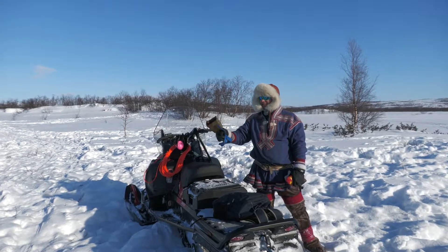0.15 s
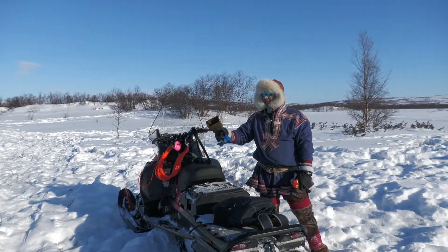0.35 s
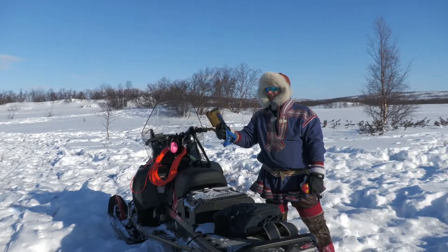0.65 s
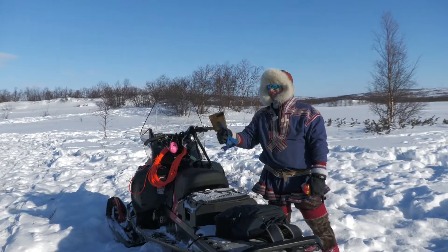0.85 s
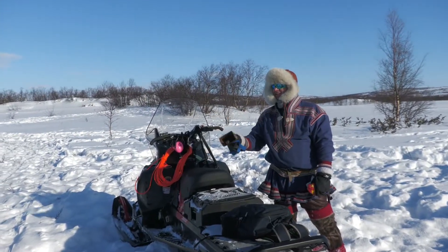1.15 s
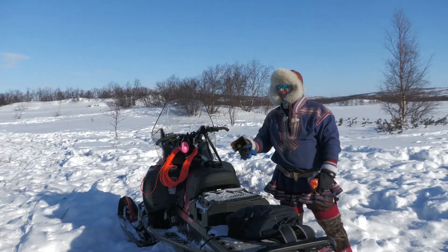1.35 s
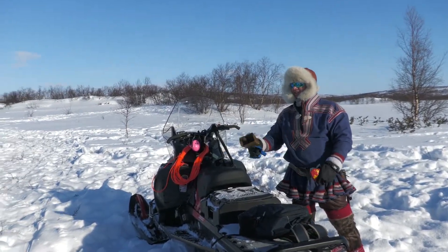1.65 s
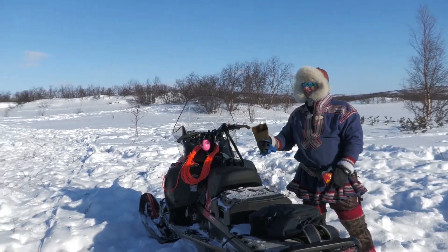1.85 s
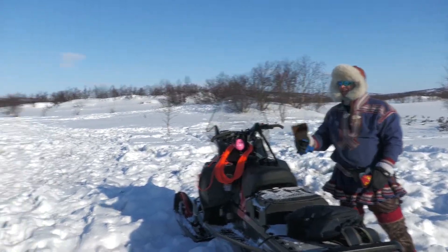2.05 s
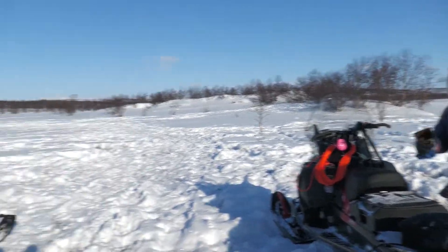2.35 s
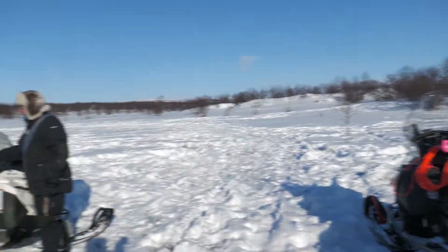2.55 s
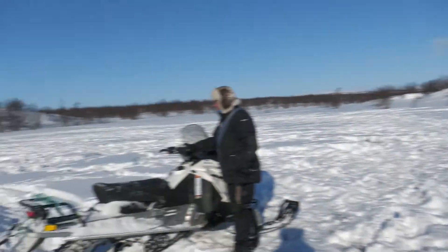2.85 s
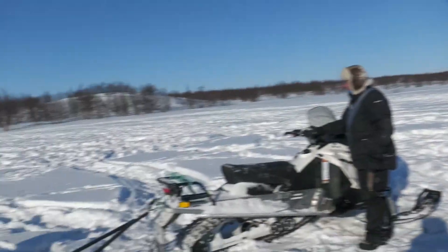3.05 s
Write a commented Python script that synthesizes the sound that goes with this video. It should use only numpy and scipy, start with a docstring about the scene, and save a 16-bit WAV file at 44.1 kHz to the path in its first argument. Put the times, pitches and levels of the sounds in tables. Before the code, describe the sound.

Close to the microphone in an open snowfield, a cowbell clangs in a quick, even rhythm, loud and slightly distorted. The ringing cuts off, followed by a faint swish of clothing and two quiet footsteps in snow.

```python
"""A sheet-metal cowbell, shaken by hand over open snow, close to a single microphone, with no echo.
The clapper strikes about ten times a second, each stroke a hollow note, a crack and a clang; in between
it taps and chatters on the wall. The bell is then muffled, leaving faint air, a brush of clothing and
two soft steps in the snow. Loud strokes overload the recorder, which saturates and adds a faint thud."""
import sys
import numpy as np
from scipy import signal
from scipy.fft import rfft, irfft, next_fast_len
from scipy.io import wavfile

SR = 44100
rng = np.random.default_rng(int(sys.argv[2]) if len(sys.argv) > 2 else 0)


def wrap_up_sound(samples):
    """Save the sound to the file named by the first command line argument, as 16-bit audio."""
    columns = np.atleast_2d(samples).T
    # keep every value between -1 and 1, then stretch to whole-number steps
    tamed = np.clip(columns, -1, 1)
    steps = np.round(tamed * 32767).astype(np.int16)
    wavfile.write(sys.argv[1], SR, steps)


N = 141120
TIME_S = np.arange(N) / SR
TOP_HZ = 16400


def amp(db):
    """Decibels to gain."""
    return 10 ** (np.asarray(db) / 20)


def unit(x):
    """Scale to rms 1."""
    return x / np.sqrt(np.mean(x ** 2) + 1e-20)


def level_at(spectrum, hz):
    """Read (Hz, dB) points on a log frequency axis."""
    point_hz, db = np.transpose(spectrum)
    return np.interp(np.log(hz + 1), np.log(point_hz + 1), db)


def curve(rows, column=1):
    """Read one column of a time table at every sample."""
    rows = np.asarray(rows)
    return np.interp(TIME_S, rows[:, 0], rows[:, column])


def filtered(x, response):
    """Apply a gain that depends on frequency."""
    size = next_fast_len(N + SR // 2)
    return irfft(rfft(x, size) * response(np.fft.rfftfreq(size, 1 / SR)), size)[:N]


def noise(spectrum):
    """Coloured noise of rms 1."""
    return unit(filtered(rng.standard_normal(N), lambda hz: amp(level_at(spectrum, hz))))


def impulses(starts, sizes):
    """One impulse at each start, given in seconds."""
    return np.bincount(np.clip(np.round(starts * SR).astype(int), 0, N - 1), sizes, N)


def fade(x, t60):
    """Give every impulse a decay of 60 dB in t60 seconds."""
    return signal.lfilter([1], [1, -amp(-60 / (t60 * SR))], x)


def ring(x, hz, t60):
    """One mode: a unit impulse starts a decaying sine of height 1."""
    radius, angle = amp(-60 / (t60 * SR)), 2 * np.pi * hz / SR
    return signal.lfilter([0, radius * np.sin(angle)], [1, -2 * radius * np.cos(angle), radius ** 2], x)


# Air over the snowfield. Each row: frequency in Hz, relative level in dB.
AIR_SPECTRUM = [(25, -7), (60, -5), (130, 5), (300, -1.5), (500, -4), (1000, -10.5), (3000, -16.5),
                (5000, -28.5), (8000, -28), (16000, -36)]
# The air at the microphone. Each row: time in seconds, level in dB.
AIR_SWELL = [(0, -67.5), (2.4, -79), (2.6, -66.5), (3.0, -60.5), (3.2, -62.5)]
def air():
    """Faint outdoor air sinks slowly, then swells near the end."""
    return amp(curve(AIR_SWELL)) * noise(AIR_SPECTRUM)


# Clothing near the microphone. Each row: frequency in Hz, relative level in dB.
CLOTH_SPECTRUM = [(200, 21), (1500, 13), (4500, 6), (7000, -17), (15000, -7)]
def clothing(peak_s=2.857, width_s=0.032, peak_db=-57):
    """Cloth brushes once in a short, smooth swish."""
    return amp(peak_db) * np.exp(-((TIME_S - peak_s) / width_s) ** 2) * noise(CLOTH_SPECTRUM)


# Steps in the snow. Each row: start in seconds, level in dB.
FOOTFALLS = [(2.921, -47), (3.176, -43.5)]
# Snow underfoot. Each row: frequency in Hz, relative level in dB.
SNOW_SPECTRUM = [(40, -11.5), (150, -14), (300, 12), (600, -3), (1200, -12), (2500, -49), (10000, -63.5)]
def footsteps(attack_s=0.0032, t60=0.08):
    """Snow gives way softly under each foot."""
    tread = np.zeros(N)
    for start, db in FOOTFALLS:
        age = np.maximum(TIME_S - start, 0)
        tread += amp(db - 60 * age / t60) * np.minimum(age / attack_s, 1)
    return tread * noise(SNOW_SPECTRUM)


# Full clapper strokes. Each row: start in seconds, then hollow note, clang, treble and crack in dB.
FULL_STROKES = [(0.0, -17, -34, -46.5, -28), (0.1192, -12, -41, -49, -19.5),
                (0.2222, -22, -25.5, -39.5, -20.5), (0.2993, -13.5, -44, -46, -17.0),
                (0.3886, -8, -34.5, -47.5, -20.5), (0.4664, -14, -32.5, -38.5, -19.5),
                (0.5686, -12.5, -40, -48, -20.5), (0.6505, -16, -47, -50, -17.5),
                (0.7543, -10, -59.5, -52, -22), (0.8461, -12.5, -36.5, -51, -17.5),
                (0.9578, -11, -35.5, -62, -20.5), (1.0501, -14, -34.5, -44, -16),
                (1.1522, -10.0, -35, -46.5, -18.5), (1.2288, -13, -55.5, -47.5, -18.5),
                (1.3336, -9.5, -48, -48.5, -18.5), (1.4203, -11.5, -36.5, -53, -21.5),
                (1.5101, -13.5, -38.5, -41.5, -25), (1.5784, -11, -35, -43.5, -23),
                (1.7055, -11.5, -39, -50, -17.0), (1.7765, -16, -32, -38, -24.5),
                (1.8864, -9.5, -44, -55, -16.5), (1.973, -14, -30, -43.5, -23.5),
                (2.0756, -8.5, -36, -54, -21), (2.1741, -12.5, -36.5, -51, -22.5),
                (2.2805, -15.0, -28, -36.5, -23), (2.3711, -11.5, -37.5, -48, -19.5),
                (2.6298, -7, -35.0, -54, -24)]
# Light rebounds. Each row: start in seconds, then hollow note, clang and treble in dB.
REBOUNDS = [(0.047, -55, -40, -47.5), (0.0818, -51, -35.0, -49.5), (0.1437, -22.5, -36, -44.0),
            (0.4245, -53, -37, -45), (0.6096, -22, -52, -45.0), (0.6775, -24, -37, -45.5),
            (0.7787, -18.5, -59, -51.5), (0.872, -23, -41, -50), (0.985, -22, -41, -53.0),
            (1.098, -38, -39.5, -43), (1.198, -22.5, -41, -63), (1.249, -21, -44.5, -71),
            (1.2735, -34.0, -33.5, -48.5), (1.368, -41, -45.5, -60), (1.4662, -26.5, -42.5, -54),
            (1.545, -34, -51, -70), (1.6268, -21.5, -37.5, -49.5), (1.747, -44, -60, -86),
            (1.9211, -35, -49, -67), (2.0169, -21, -31, -38), (2.1227, -59, -39, -49.5),
            (2.206, -31, -43.5, -54), (2.269, -25.5, -30, -52.5), (2.41, -42, -42.5, -47),
            (2.4594, -16, -34.5, -44.5), (2.52, -32, -46.5, -67.5), (2.541, -44, -39.5, -58),
            (2.5951, -35.5, -68.5, -74.5), (2.655, -50, -37, -65), (2.6894, -24.5, -38.5, -46.5)]
def contacts():
    """All the clapper's blows, as columns; a rebound's crack is set 10 dB below its treble."""
    rebounds = [[*row, row[3] - 10] for row in REBOUNDS]
    return np.transpose(list(FULL_STROKES) + rebounds)


# The recorder's overload thud. Each row: frequency in Hz, relative level in dB.
OVERLOAD_SPECTRUM = [(25, 2), (150, -3), (270, 4), (380, -14.5), (800, -34.5)]
def overload_thuds(relative_db=-34):
    """A faint low thud of recorder distortion as each loud stroke overloads it."""
    starts, hollow_db = np.transpose(FULL_STROKES)[:2]
    return fade(impulses(starts, amp(hollow_db + relative_db)), t60=0.027) * noise(OVERLOAD_SPECTRUM)


# How hard the clapper chatters. Each row: time in seconds, relative level in dB.
CHATTER_STRENGTH = [(0, -1), (.18, 4), (.25, 16.5), (.36, -4), (.45, 7.5), (.72, 9), (.93, 0), (1.02, 6),
                    (1.3, 1), (1.67, -4.5), (1.83, 13), (1.93, -1), (2.03, 10.5), (2.23, -7), (2.31, 9.5),
                    (2.6, -1.5), (2.68, 7.5), (2.75, -4.5)]
def chatter(ticks_per_s=260):
    """Tiny random contacts of the loose clapper."""
    return (rng.random(N) < ticks_per_s / SR) * amp(curve(CHATTER_STRENGTH))


# The chattering contacts. Each row: frequency in Hz, relative level in dB.
BUZZ_SPECTRUM = [(300, -47), (700, -28.5), (1100, -31), (1380, 4), (1550, -11), (1780, -0.5), (1920, 10.5),
                 (2200, -7), (2600, -27), (2950, -3), (3200, -21), (4600, -17.5), (6000, -25), (12000, -48),
                 (16000, -61)]
def buzz(ticks, level_db=-47):
    """The clapper's tiny contacts run together into a buzz."""
    return amp(level_db) * unit(fade(ticks, t60=0.048)) * noise(BUZZ_SPECTRUM)


# The clapper's impact. Each row: frequency in Hz, relative level in dB.
CRACK_SPECTRUM = [(30, -31.5), (350, -18), (600, -3.5), (900, 11.5), (1500, 4.5), (2000, 6.5), (2400, 10.5),
                  (2900, -7), (3450, 3.5), (4100, -7), (5050, 8), (5900, -7), (7700, -0.5), (11000, -12),
                  (15000, -18), (16400, -33.5)]
def cracks(tail_db=-14):
    """Metal hits metal: a sharp burst with a short tail."""
    starts, *_, crack_db = contacts()
    blows = impulses(starts, amp(crack_db))
    return (fade(blows, t60=0.017) + amp(tail_db) * fade(blows, t60=0.032)) * noise(CRACK_SPECTRUM)


def drive(starts, blow_db, ticks, chatter_db):
    """Blows and chatter feed one partial; the clapper lands anywhere between its nodes and antinodes."""
    across, along = np.cos(2 * np.pi * rng.random((len(starts), 2))).T
    force = impulses(starts, amp(blow_db) * np.sqrt(2) * across * along)
    tick_at = np.flatnonzero(ticks)
    coupling = np.resize(rng.standard_normal(2048), len(tick_at))
    force[tick_at] += amp(chatter_db) * ticks[tick_at] * coupling
    return force


# The wall's treble partials. Each entry: pitch in Hz; in the second list, relative level in dB.
HIGH_MODE_HZ = [5420, 5600, 5740, 5970, 6337, 6766, 6870, 7025, 7480, 7550, 7690, 7892, 8243, 8492, 8885,
                9030, 9570, 10620, 11020, 11746, 12005, 12790]
HIGH_MODE_DB = [2, -9, -2.5, -6.5, 3, -1, -3, -0.5, -2.5, -1, -14, -2.5, -2.5, -11.5, -9, -6.5, -10.5,
                -15.5, -11, -12.5, -12.5, -14]
# Dense weak partials among and above them. Each row: frequency in Hz, relative level in dB.
SHIMMER_SPECTRUM = [(4300, -12), (6000, -30), (9000, -7), (10500, -22), (12000, -14.5), (13300, -27.5),
                    (15200, -26.5), (16000, -33)]
def treble_ring(ticks, chatter_db=-77.5, shimmer_count=80):
    """The wall's high partials ring over a shorter shimmer of unevenly spaced ones."""
    starts, _, _, treble_db, _ = contacts()
    out = np.zeros(N)
    for hz, db in zip(HIGH_MODE_HZ, HIGH_MODE_DB):
        out += amp(db) * ring(drive(starts, treble_db, ticks, chatter_db), hz, t60=0.16)
    lowest_hz = SHIMMER_SPECTRUM[0][0]
    positions = (np.arange(shimmer_count) + rng.random(shimmer_count)) / shimmer_count
    for hz in lowest_hz + (TOP_HZ - lowest_hz) * positions:
        force = drive(starts, treble_db, ticks, chatter_db)
        out += amp(level_at(SHIMMER_SPECTRUM, hz)) * ring(force, hz, t60=0.074)
    return out


# The wall's clanging partials. Each entry, list by list: pitch in Hz, relative level in dB, t60 in seconds.
WALL_HZ = [1077, 1274, 1608, 1862, 1925, 1977, 2387, 2743, 2925, 2982, 3437, 3938, 4043, 4220, 4552, 4882,
           5130]
WALL_DB = [-3.5, -2.5, -5.5, 4.5, 4.5, 2.5, 2, -5, 2.5, -3.5, 1, -12.5, -8.5, -6, -12.5, -2, -11.5]
WALL_T60_S = [0.53, 0.24, 0.65, 0.096, 0.11, 0.15, 0.12, 0.44, 0.13, 0.32, 0.055, 0.28, 0.21, 0.16, 0.22,
              0.13, 0.084]
# Slow drift of the lowest three. Each row: time in seconds, then gain of each partial in dB.
WALL_DRIFT = [(0, -4, 1, -9), (.3, -8, 3.5, -2.5), (.7, 8.5, 7, -19), (1.1, -3.5, -0.5, -3.5),
              (1.6, -12.5, 5.5, 0.5), (1.85, -3.5, 6, -8.5), (2.3, -15, 2.5, 2), (2.65, -21, 5, 7.5)]
def clang(ticks, chatter_db=-58):
    """Every contact rings the sheet-metal wall's partials in a new mix."""
    starts, _, clang_db, _, _ = contacts()
    out = np.zeros(N)
    for k, (hz, db, t60) in enumerate(zip(WALL_HZ, WALL_DB, WALL_T60_S)):
        drift_db = curve(WALL_DRIFT, column=k + 1) if k < 3 else 0
        out += ring(amp(db + drift_db) * drive(starts, clang_db, ticks, chatter_db), hz, t60)
    return out


# Two close clonk modes, then a longer hum. Each row: pitch in Hz, relative level in dB, t60 in seconds.
HOLLOW_MODES = [(657, -4.5, .058), (679, -2.5, .068), (686, -12.5, .24)]
def hollow_note(pitch_spread=0.0045, attack_s=0.0018, chatter_db=-44.5):
    """The bell's lowest note: a clonk, a little different at each blow, and a hum roughened by chatter."""
    starts, hollow_db = contacts()[:2]
    out, age = np.zeros(N + SR), np.arange(SR // 3) / SR
    attack = 1 - np.exp(-age / attack_s)
    detune = 1 + pitch_spread * rng.standard_normal((len(starts), len(HOLLOW_MODES)))
    for start, blow_db, shifts in zip(starts, hollow_db, detune):
        note = sum(amp(db - 60 * age / t60) * np.cos(2 * np.pi * hz * shift * age)
                   for (hz, db, t60), shift in zip(HOLLOW_MODES, shifts))
        out[round(start * SR):][:len(age)] += amp(blow_db) * note * attack
    hum_hz, _, hum_t60 = HOLLOW_MODES[-1]
    rough_hum = ring(chatter() * rng.standard_normal(N), hum_hz, hum_t60 / 2)
    return out[:N] + amp(chatter_db) * rough_hum


def scene(muffle_s=2.777, muffle_t60=0.094, radiate_hz=507.6):
    """The bell rings until it is muffled, over the recorder's thuds and the quiet snowfield."""
    note = hollow_note()
    ticks = chatter()
    bell = note + buzz(ticks) + clang(ticks) + treble_ring(ticks) + cracks()
    bell *= amp(-60 * np.maximum(TIME_S - muffle_s, 0) / muffle_t60)
    # A small bell hardly radiates low frequencies.
    radiation = signal.butter(4, radiate_hz, "highpass", fs=SR, output="sos")
    return (signal.sosfilt(radiation, bell) + overload_thuds() + clothing() + air() + footsteps())[None]


def record(dry):
    """The recorder flattens the loudest peaks and keeps nothing above its band limit."""
    ceiling, hardness = 0.22, 6
    saturated = dry[0] / (1 + np.abs(dry[0] / ceiling) ** hardness) ** (1 / hardness)
    return filtered(saturated, lambda hz: hz < TOP_HZ)[None]


dry = scene()
out = record(dry)
wrap_up_sound(out)
```